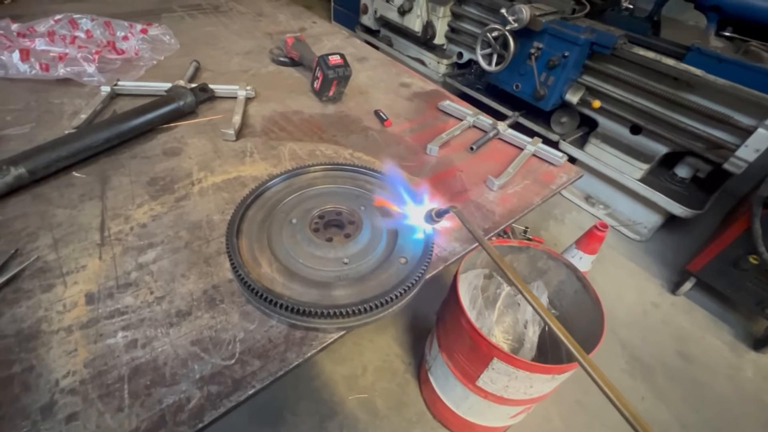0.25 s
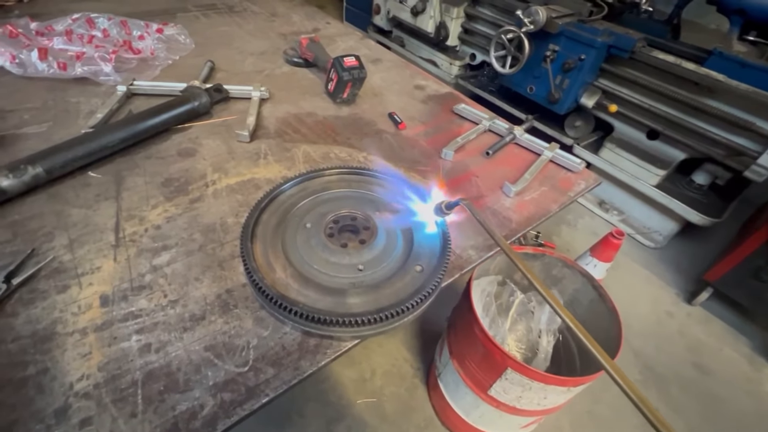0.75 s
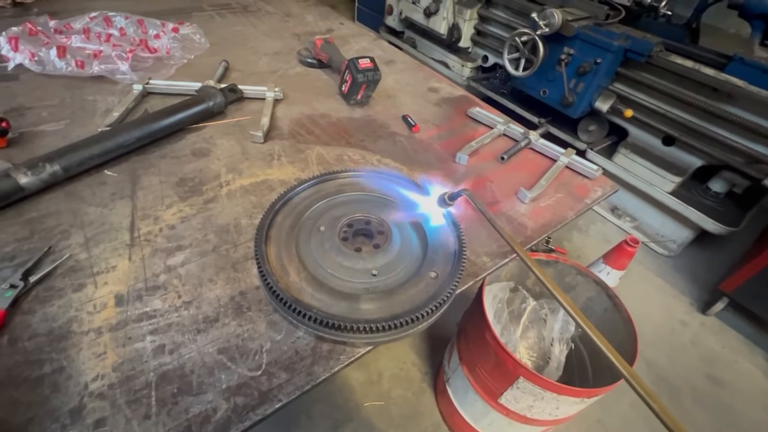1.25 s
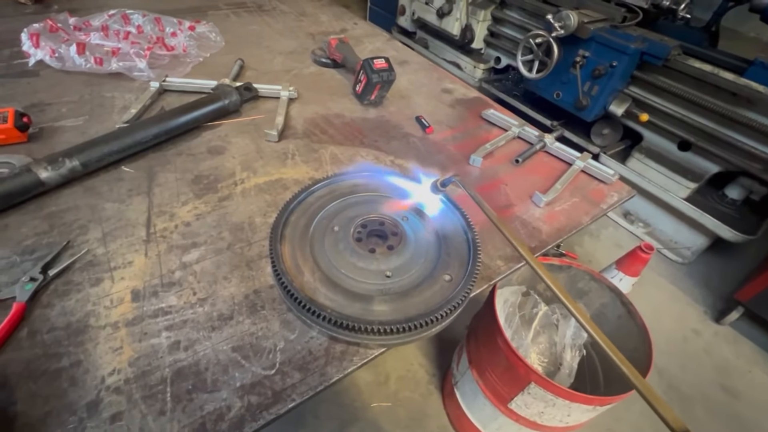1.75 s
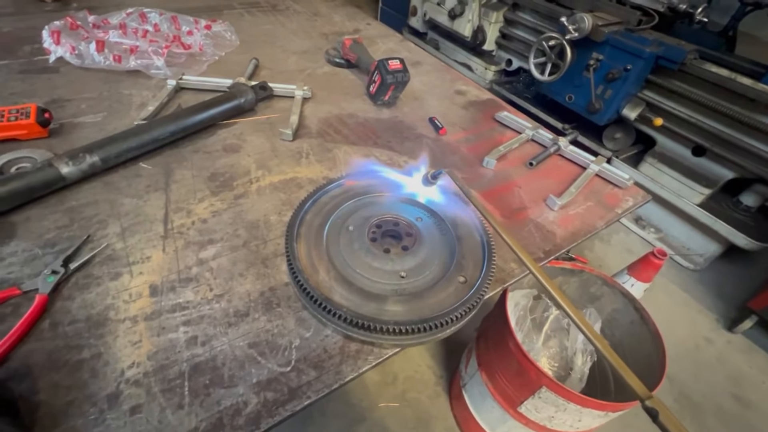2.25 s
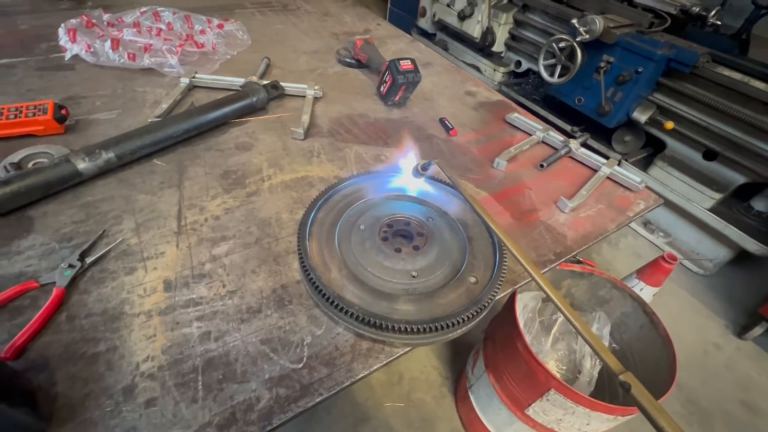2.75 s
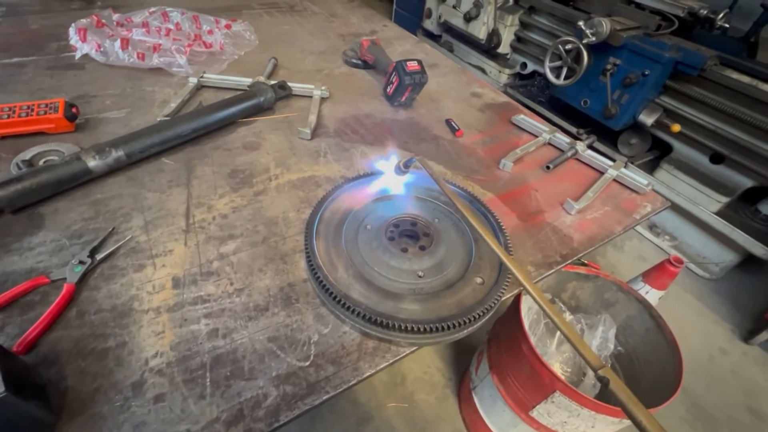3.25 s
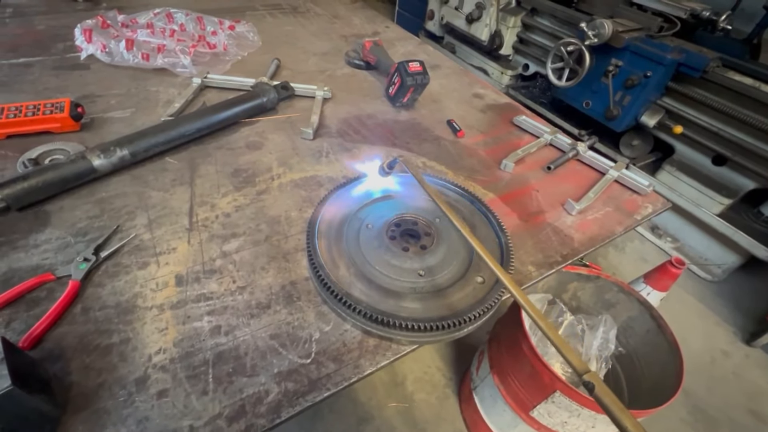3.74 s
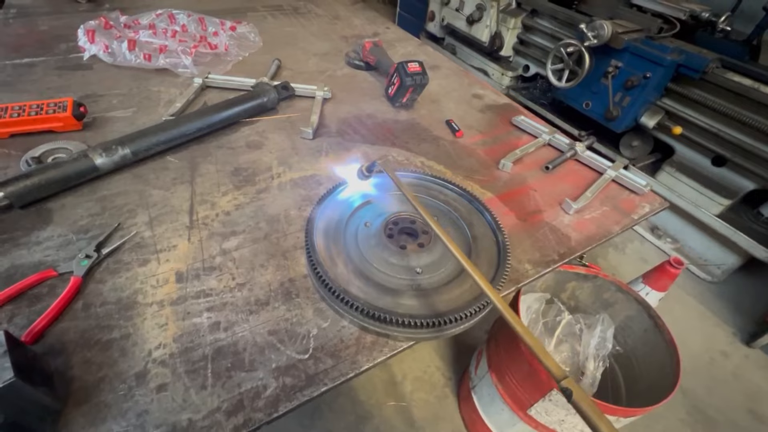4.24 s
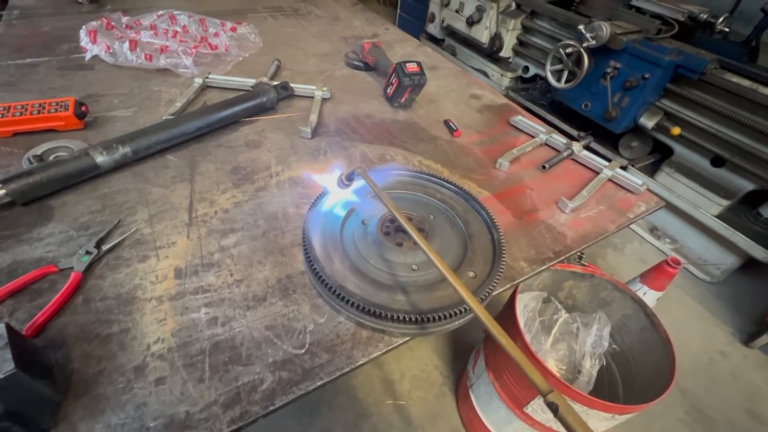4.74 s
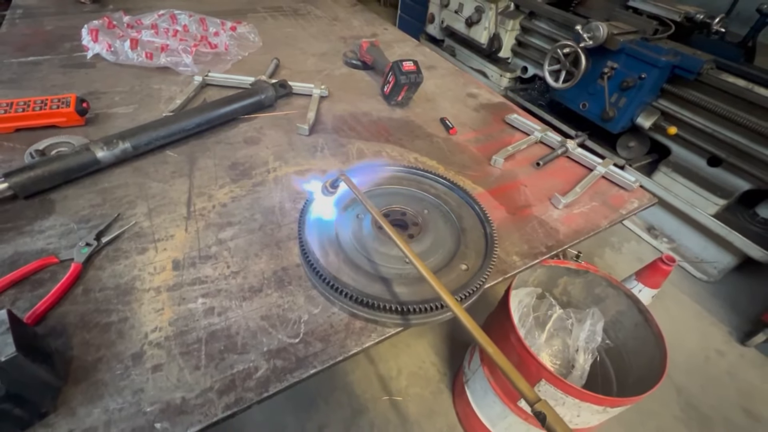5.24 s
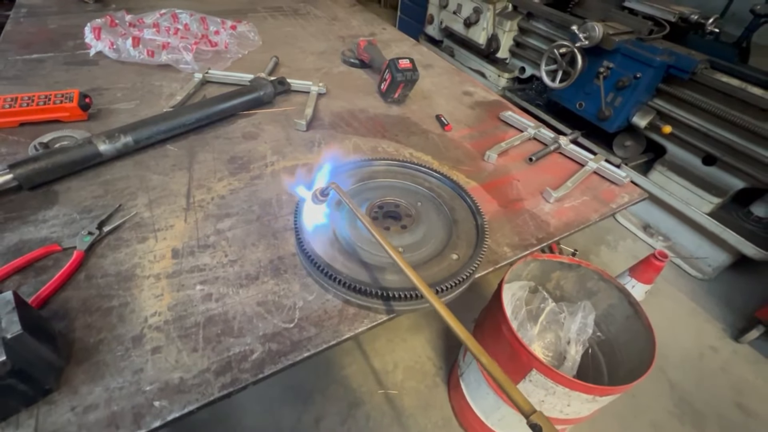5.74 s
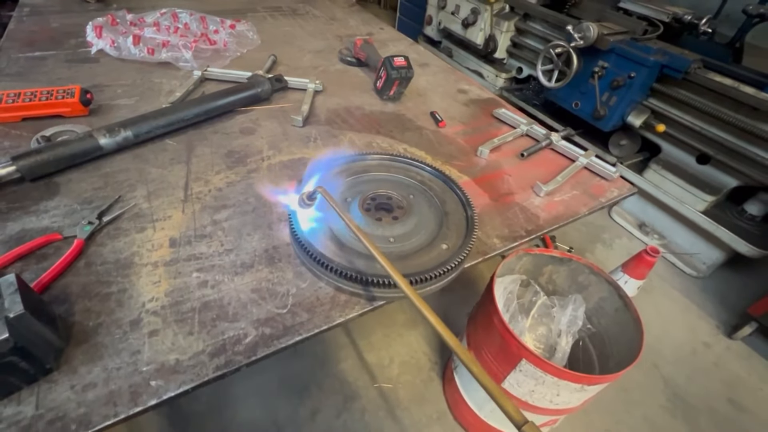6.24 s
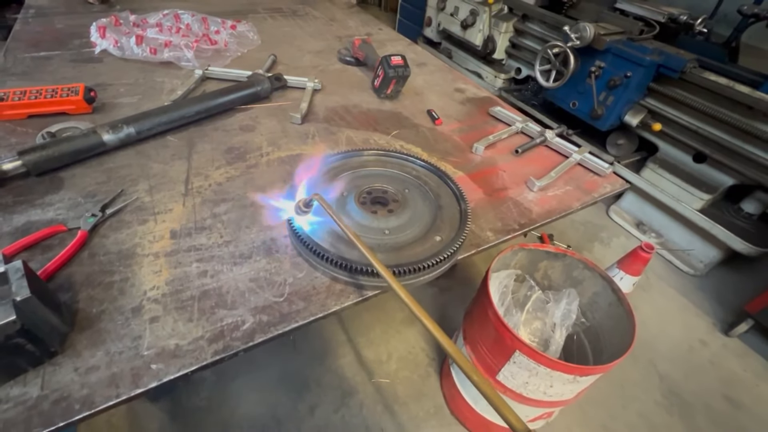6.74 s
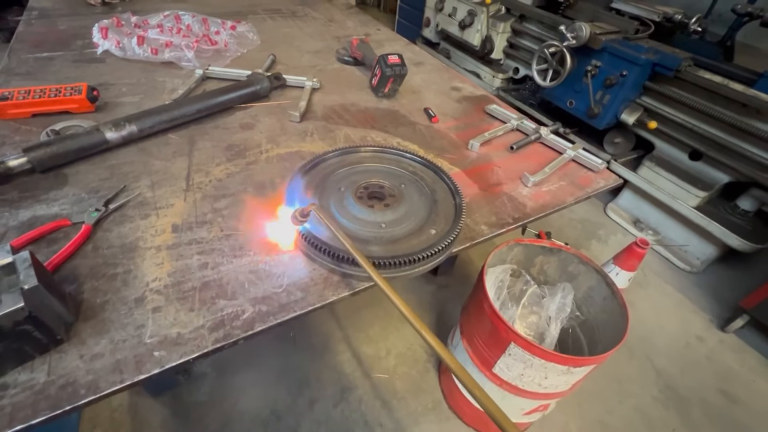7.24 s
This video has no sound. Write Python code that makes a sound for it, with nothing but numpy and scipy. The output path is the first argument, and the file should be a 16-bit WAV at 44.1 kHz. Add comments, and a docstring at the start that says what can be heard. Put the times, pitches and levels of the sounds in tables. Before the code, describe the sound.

Close, continuous torch hiss over a soft low roar, swelling and changing colour as the flame moves around a steel disc in a workshop.

```python
"""On a workshop bench, a gas torch heats a steel flywheel near a hand-held camera.
The jet fizzes brightly: random noise shaped by pitch, with its level and colour moving over time.
Where it strikes the steel it sings in broad hissing bands that swell as the hand moves it, and once in a narrow
whistling hiss as the flame flares. Under this, the flame's noise roars low and steady.
The camera's two microphone ports hear it with a phase and level difference that changes with pitch and bearing."""
import sys
import numpy as np
from scipy import signal
from scipy.fft import rfft, irfft, next_fast_len
from scipy.io import wavfile
from scipy.ndimage import uniform_filter1d, map_coordinates

SR = 44100
rng = np.random.default_rng(int(sys.argv[2]) if len(sys.argv) > 2 else 0)


def to_wav(s):
    """Save 16-bit WAV."""
    ch = np.atleast_2d(s).T  # columns
    pcm = np.round(np.clip(ch, -1, 1) * 32767)  # PCM
    wavfile.write(sys.argv[1], SR, pcm.astype(np.int16))


N = 330309  # length in samples
FRAME, HOP = 1024, 256  # short-time spectrum: frame length and step, in samples

# How loud the fizz is over time, before a fixed lift: start_s, level_db
FIZZ_LEVEL = [(0.0, -27.5), (0.42, -27.5), (0.48, -26), (1.38, -23), (1.48, -35), (1.5, -25.5),
              (2.06, -30.5), (2.27, -23.5), (2.73, -27.5), (2.77, -22), (3.09, -29), (3.63, -31.5),
              (3.69, -36.5), (3.9, -30), (4.55, -31.5), (4.65, -27), (4.84, -40.5), (4.9, -28.5),
              (5.07, -39.5), (5.42, -31.5), (5.8, -39.5), (5.94, -32.5), (5.99, -35), (6.18, -32.5),
              (6.25, -26.5), (6.34, -22.5), (6.55, -28), (6.78, -25.5), (7.09, -31.5), (7.22, -25.5),
              (7.28, -34), (7.49, -30)]
# Tone colour of the nozzle fizz: pitch_hz, relative_level_db (per Hz)
FIZZ_COLOUR = [(2500, -30), (4200, -18), (6200, -9), (7300, -11), (8500, -7), (9300, -7), (10500, -4),
               (11700, 0), (12400, -2.5), (12900, -10), (13200, -7), (13600, -11.5), (14300, -8),
               (15600, -4.5), (16500, -5)]
# How the fizz tilts over time: start_s, gain_near_9khz_db, gain_near_15khz_db
FIZZ_TILT = [(0, -4, 2), (0.85, -7, 0), (1.2, -6, -1), (1.8, -1.5, -2), (2.6, -3.5, 1), (3.2, -0.5, 3),
             (4.0, 5.5, 5), (4.6, 3, 1), (5.2, -1.5, 5), (5.5, 5, 0), (5.8, -9, 6), (6.15, 1, -2),
             (6.5, 0.5, 0), (7, -2.5, 4), (7.49, 5, 5)]
# Where each tilt gain acts: pitch_hz, weight_of_9khz_gain (0-1), weight_of_15khz_gain (0-1)
TILT_REACH = [(7500, 0, 0), (9000, 1, 0), (11500, 0, 0), (13500, 0, 0), (15000, 0, 1)]
FLICKER_DB, FLICKER_PER_S = 1, 25  # quick unsteadiness of the whole fizz
EDGE_DRIFT_DB, EDGE_DRIFT_PER_S = 2.4, 5  # each tilt gain also drifts alone


def jet():
    """Turbulence at the nozzle: bright fizz in eddies, its colour tilting as the torch turns."""
    hz, t = grid()
    level_db, = curves(FIZZ_LEVEL, t)
    low_reach, top_reach = curves(TILT_REACH, hz)
    low_tilt_db, top_tilt_db = (EDGE_DRIFT_DB * wobble(EDGE_DRIFT_PER_S) + db for db in curves(FIZZ_TILT, t))
    level_db = level_db + 5.5 + FLICKER_DB * wobble(FLICKER_PER_S)
    tilt_db = low_reach * low_tilt_db + top_reach * top_tilt_db
    fizz = spectrum(FIZZ_COLOUR) * amp(level_db + tilt_db) ** 2
    broad_eddies = patches(2.14, 2440, .04)
    narrow_eddies = patches(3.2, 400, .03)
    return panned(fizz * broad_eddies * narrow_eddies, 0)


# The jet on the steel; the low band is lifted a little when played:
# start_s, low_band_db, 5khz_band_db, 6khz_band_db, high_band_db
STRIKE_LEVELS = [(0.0, -49, -47, -38, -36), (0.08, -40, -47, -34, -24), (0.48, -42, -33, -33, -25.5),
                 (0.64, -43, -51, -41, -33), (0.7, -43, -36, -38, -25.5), (0.77, -35.5, -24.5, -36, -23),
                 (0.92, -35.5, -40, -47, -38), (1.04, -34, -28, -29, -36), (1.23, -38.5, -35.5, -37, -21.5),
                 (1.42, -37, -27.5, -43, -29), (1.77, -35.5, -33.5, -25.5, -23.5),
                 (2.09, -42, -37.5, -33, -38), (2.25, -39, -22.5, -33, -39),
                 (2.4, -31, -28.5, -22.5, -18.5), (2.54, -32, -26, -28.5, -44),
                 (2.67, -29.5, -25, -48, -61), (3.09, -34.5, -30.5, -25.5, -27),
                 (3.27, -37.5, -38, -33, -44), (3.54, -37.5, -31, -21, -38), (3.6, -38.5, -31, -34, -40),
                 (3.66, -45, -41, -43, -32), (3.78, -45.5, -35, -38, -35), (3.9, -40.5, -41, -31.5, -47),
                 (3.98, -42.5, -39, -35, -41), (4.3, -47.5, -37.5, -36, -37),
                 (4.65, -44.5, -36.5, -38, -48), (5.17, -51.5, -39.5, -46.5, -38),
                 (5.46, -41.5, -32.5, -38, -34.5), (5.55, -51.5, -37, -42, -36),
                 (6.01, -40.5, -44, -35, -38), (6.18, -39.5, -35, -33.5, -37),
                 (6.26, -36.5, -29, -23.5, -36), (6.4, -35, -26.5, -21, -40),
                 (6.84, -35.5, -33, -31.5, -30), (7.05, -43.5, -36.5, -41, -30),
                 (7.28, -50, -35.5, -49, -33), (7.49, -43, -40, -31, -31)]
# Centres of the two wandering bands, in Hz, as the torch goes from right to left
LOW_HZ, HIGH_HZ = (3600, 3510, 3620, 3770), (7130, 7700)
LOW_WANDER, HIGH_WANDER, WANDER_PER_S = 0.0096, 0.077, 7  # random wander, as a share of the centre
# Pan, left minus right: 5 kHz band with the torch at the right and at the left; high band throughout
FIVE_PAN_DB, HIGH_PAN_DB = (5, -2), -1.5
BAND_DRIFT_DB, BAND_DRIFT_PER_S = 1.5, 13  # each band swells and sinks alone


def strike():
    """The jet hitting rim and teeth sings in four broad bands, two of which wander in pitch."""
    low_db, five_db, six_db, high_db = curves(STRIKE_LEVELS, grid()[1])
    low_hz = bearing(*LOW_HZ) * (1 + LOW_WANDER * wobble(WANDER_PER_S))
    high_hz = bearing(*HIGH_HZ) * (1 + HIGH_WANDER * wobble(WANDER_PER_S))

    def drifting(db):
        """Power of one band as it swells and sinks."""
        return amp(db + BAND_DRIFT_DB * wobble(BAND_DRIFT_PER_S)) ** 2

    low = band(low_hz, 770) * drifting(low_db + 3)
    five = band(5160, 900) * drifting(five_db)
    six = band(6200, 670) * drifting(six_db)
    high = band(high_hz, 1230) * drifting(high_db)
    both = panned(low + six, 0) + panned(five, bearing(*FIVE_PAN_DB)) + panned(high, HIGH_PAN_DB)
    return both * patches(2.9, 250, .05) * patches(0.94, 2800, .025)


# A narrow whistling hiss as the flame flares: start_s, pitch_hz, level_db
FLARE_PATH = [(6.15, 7200, -60), (6.27, 7160, -34), (6.4, 7060, -28.5), (6.55, 7160, -28), (6.7, 6930, -29),
              (6.85, 7100, -31.5), (6.97, 7600, -35), (7.1, 7500, -63)]


def flare():
    """The flame catching the rim's edge sings in one narrow band, loudest at the right port."""
    t = grid()[1]
    hz, db = curves(FLARE_PATH, t)
    sounding = (t > FLARE_PATH[0][0]) & (t < FLARE_PATH[-1][0])
    return panned(band(hz, 270) * sounding * amp(db) ** 2 * patches(2.2, 400, .04), -14.0)


# Tone colour of the low roar: pitch_hz, relative_level_db (per Hz)
LOW_COLOUR = [(20, -50), (35, -46), (50, -32), (70, -8), (100, 0.5), (250, 1.5), (420, 1), (600, -4.5),
              (850, -9), (1500, -31.5), (3000, -31)]
# Tone colour of the upper roar: pitch_hz, relative_level_db (per Hz)
UPPER_COLOUR = [(500, 0), (850, 2), (1150, 5.5), (1350, -2), (1500, -0.5), (1650, -1.5), (2000, -41)]
# Tone colour of the thin roar: pitch_hz, relative_level_db (per Hz)
THIN_COLOUR = [(1100, -22), (1450, 1), (1650, 10), (1900, 11.5), (2200, 9.5), (2700, 6.5), (3100, 6),
               (4000, -20), (8000, -30)]
# How loud the two weaker roars are, before fixed lifts: start_s, upper_roar_db, thin_roar_db
ROAR_LEVELS = [(0.0, -38.5, -44), (0.7, -38.5, -42), (1.44, -41, -43.5), (2.0, -40, -40),
               (2.42, -40.5, -42), (2.9, -40, -54), (3.38, -43, -51), (3.98, -40.5, -48.5), (4.6, -43, -49),
               (5.28, -45.5, -48), (6.0, -42.5, -48.5), (6.5, -39.5, -57), (7.0, -39, -48.5),
               (7.49, -36, -46.5)]
ROAR_DB, ROAR_GROWS_DB = -34, 1  # the low roar holds steady, a little fuller with the torch at the left


def flame():
    """Burning gas: a steady low roar and two weaker humps above it."""
    upper_db, thin_db = curves(ROAR_LEVELS, grid()[1])
    low = spectrum(LOW_COLOUR) * amp(bearing(ROAR_DB, ROAR_DB + ROAR_GROWS_DB)) ** 2
    upper = spectrum(UPPER_COLOUR) * amp(upper_db + 1.5) ** 2
    thin = spectrum(THIN_COLOUR) * amp(thin_db + 2.5) ** 2
    return panned((low + upper + thin) * patches(0.85, 300, 0.027), 0)


def bench():
    """Echoes off steel and bench colour the hiss in narrow, slowly shifting streaks, a little apart at each port."""
    return patches(1.7, 120, .25) * panned(1, 1.2 * echoed() * field(200, .3))


def echoed():
    """The middle band, where echoes of the workshop reach the two ports differently."""
    hz = grid()[0]
    return (hz > 1500) & (hz < 8300)


# How far the left side leads, in half turns of phase, by where the torch is:
# pitch_hz, at_right, at_far_right, at_far_left, at_left (half turns)
PORT_LEAD = [(40, -.03, -.03, -.03, -.03), (215, -.09, -.09, -.09, -.09), (400, -.27, -.26, -.25, -.25),
             (700, -.5, -.45, -.4, -.42), (800, -.72, -.75, -.72, -.7), (900, -1.05, -1.05, -1.1, -1),
             (1400, -2.4, -2.5, -2.6, -2.2), (1600, -2.55, -2.7, -2.9, -2.3), (1800, -2.95, -3, -3.3, -2),
             (2000, -2.95, -3.1, -2.5, -2.4), (2200, -3, -3.2, -2.9, -3), (2400, -3.1, -2.4, -3.2, -3),
             (2600, -3.1, -2.8, -2.3, -3), (2800, -2.8, -2.85, -2.1, -2.1), (3100, -2.95, -2.75, -2.35, -2),
             (3400, -3.05, -2.9, -2.5, -2.1), (3600, -3.6, -3.5, -2.9, -2.4),
             (4000, -3.85, -3.8, -3.1, -2.55), (4400, -3.95, -4.1, -2.9, -2.8),
             (4800, -4, -2.85, -2.9, -2.85), (5000, -4, -3.3, -3.2, -2.95), (5400, -3.7, -3.5, -3.5, -3.5),
             (6000, -4, -4, -4, -4), (6400, -4.2, -4.2, -4.2, -4.2), (7200, -5.75, -5.75, -5.75, -5.75),
             (8400, -6.1, -6.1, -6.1, -6.1), (8900, -6, -6, -6, -6), (12200, -4, -4, -4, -4),
             (13900, -3, -3, -3, -3), (15500, -2, -2, -2, -2), (17000, -2, -2, -2, -2)]
# Best likeness of left and right, by where the torch is: pitch_hz, at_right (0-1), at_left (0-1)
PORT_LIKENESS = [(40, .88, .88), (100, .985, .985), (215, .97, .97), (400, .95, .95), (820, .94, .87),
                 (880, .94, .8), (1050, .65, .65), (1400, .8, .7), (1600, .85, .55), (1900, .85, .45),
                 (2200, .88, .75), (2400, .7, .85), (2600, .55, .7), (2800, .7, .35), (3100, .8, .75),
                 (3300, .88, .75), (3450, .55, .75), (3800, .9, .65), (4200, .8, .8), (4700, .6, .85),
                 (5000, .7, .7), (5300, .6, .6), (6100, .98, .98), (6800, .75, .75), (8400, .85, .85),
                 (8900, 1, 1), (17000, 1, 1)]
# Left minus right level, by where the torch is: pitch_hz, at_right_db, at_left_db
PORT_SHADOW = [(215, 0, 0), (390, 1.5, 1.5), (600, -3.5, -1.5), (750, 0, -1), (860, -1, -4), (920, -6, -8),
               (1000, -11, -10), (1100, -12.5, -8), (1300, -2.5, -6), (1500, -3, -3.5), (1650, 3, -1),
               (1900, 2, 1), (2050, 0, 2.5), (2250, 0, 0), (2500, -4, 0), (2900, -3, -1), (3250, 0, 0),
               (3600, 3.5, 1.5), (4000, -1, .5), (4500, -3, 0), (5000, 0, 0)]
# Narrow drifting stretches of the hiss where left and right are exact opposites:
# start_s, end_s, from_hz, to_hz, half_width_hz
OPPOSED_STRETCHES = [(0, .75, 3150, 3170, 300), (0, .45, 2280, 2220, 150), (.6, 1.6, 2250, 2180, 210),
                     (1.6, 2.05, 2150, 2070, 200), (1.0, 1.75, 3490, 3100, 171),
                     (1.2, 2.05, 1800, 1910, 90), (2.08, 2.45, 3000, 2850, 180),
                     (2.3, 3.6, 1920, 1770, 110), (2.5, 3.0, 3460, 3700, 110), (2.3, 3.15, 4930, 4950, 120),
                     (2.5, 3.15, 6760, 6370, 110), (3.0, 3.7, 2250, 2160, 100),
                     (3.35, 3.55, 4630, 4550, 300), (3.66, 3.76, 4700, 4500, 200),
                     (3.68, 3.76, 3300, 2900, 250), (3.82, 4.02, 4050, 4200, 350),
                     (4.0, 4.14, 4700, 4700, 150), (4.08, 4.33, 3900, 4000, 250),
                     (4.52, 4.78, 3930, 4050, 330), (4.76, 4.97, 3920, 4200, 330),
                     (4.91, 4.97, 2900, 2900, 450), (4.55, 4.7, 2600, 2300, 150),
                     (5.1, 5.7, 2390, 2400, 120), (5.9, 6.65, 2430, 2280, 200), (6.7, 7.3, 2500, 2530, 200),
                     (6.1, 6.42, 4170, 4050, 150), (6.68, 7.08, 4500, 4600, 200),
                     (7.15, 7.28, 4500, 4200, 400), (7.33, 7.49, 4560, 4600, 300),
                     (6.1, 6.3, 6800, 6850, 90)]
# Stretches where left and right are the same: start_s, end_s, from_hz, to_hz, half_width_hz
IN_STEP_STRETCHES = [(0, .3, 6050, 6100, 280), (.68, 1.8, 5940, 6200, 260), (.1, .7, 4200, 3850, 220),
                     (1.95, 2.13, 3970, 3600, 300), (2.4, 3.1, 4300, 4200, 110),
                     (3.75, 4.2, 3230, 2700, 220), (5.85, 6.8, 2850, 3430, 170),
                     (6.35, 7.2, 6350, 6350, 170), (6.45, 6.8, 4050, 3970, 130)]
# How much less alike left and right sound where their phase is a quarter turn apart: middle band, top band
APART_MIDDLE, APART_TOP = .3, .45
LIKENESS_SWING_DB = 7  # swing of the power the likeness is raised to, so it comes and goes in patches


def ports(power):
    """Noise of the given power, left and right: partly alike, turned in phase, one shadowed."""
    hz, t = grid()
    alike = bearing(*curves(PORT_LIKENESS, hz))
    shadow_db = bearing(*curves(PORT_SHADOW, hz))
    direct = np.clip(curves(BEARING_PATH, t)[1], 0, 1)
    middle, top = echoed(), hz > 8300
    # the moving torch makes the phase wander, most where echoes mix in
    wander = ((.35 + 2 * (1 - direct)) * middle + .2 * top) * field(250, .4)
    lead = np.pi * bearing(*curves(PORT_LEAD, hz)) + wander  # in radians
    # the phase lead of the hiss is drawn toward whole half turns, more strongly at the top
    lead = lead - (middle / 3 + top / 2) * np.sin(2 * lead)
    lead = lead - top * np.sin(2 * lead) / 2.5
    # left and right sound less alike where their phase is a quarter turn apart
    alike = alike - (APART_MIDDLE * middle + APART_TOP * top) * np.sin(lead) ** 2
    # the room's share of the hiss differs from port to port
    alike = alike * np.where(middle, direct, 1)
    alike = np.clip(alike, 0, 1) ** amp(LIKENESS_SWING_DB * middle * field(200, .09))
    # in narrow stretches left and right are alike and equally loud, opposed or in step
    opposed, in_step = locked(OPPOSED_STRETCHES), locked(IN_STEP_STRETCHES)
    to_opposed, to_in_step = np.angle(-np.exp(-1j * lead)), np.angle(np.exp(-1j * lead))
    lead = lead + opposed * to_opposed + in_step * to_in_step
    free = 1 - np.maximum(opposed, in_step)
    alike = 1 - (1 - alike) * free
    shadow_db = shadow_db * free
    power = power * free + power.mean(axis=0) * (1 - free)
    # eddies burst for a millisecond or two
    knots = rng.standard_normal(N // 40 + 40)
    burst = amp(0.26 * map_coordinates(knots, [np.arange(N + 2 * HOP) / 60]))
    noise = unit(burst * rng.standard_normal((2, N + 2 * HOP)))
    a, b = signal.stft(noise, nperseg=FRAME, noverlap=FRAME - HOP)[2][..., :len(t)]
    # mixing two separate noises by this angle gives the wanted likeness
    turn = np.arccos(np.clip(alike, 0, 1)) / 2
    left = (np.cos(turn) * a + np.sin(turn) * b) * np.exp(.5j * lead) * amp(shadow_db / 2)
    right = (np.cos(turn) * a - np.sin(turn) * b) * np.exp(-.5j * lead) * amp(-shadow_db / 2)
    pair = np.array([left, right]) * np.sqrt(power * len(hz))
    return signal.istft(pair, nperseg=FRAME, noverlap=FRAME - HOP)[1][:, :N]


LOCK_FADE_S, LOCK_WAVER_HZ = .025, 30  # how the locked stretches set in and waver in pitch
LOCK_RAGGED = .45  # how much they fray at the edges, as a share


def locked(rows):
    """How firmly, 0-1, left and right are tied at each frequency and moment."""
    hz, t = grid()
    near = np.zeros((len(hz), len(t)))
    fray = LOCK_RAGGED * field(170, .035)
    for start, end, from_hz, to_hz, half_hz in rows:
        centre = np.interp(t, [start, end], [from_hz, to_hz]) + LOCK_WAVER_HZ * wobble(19)
        inside = np.clip(np.minimum(t - start, end - t) / LOCK_FADE_S, 0, 1)
        closeness = np.clip(1 - abs(hz - centre) / (2 * half_hz), 0, 1)
        near = np.maximum(near, inside * closeness)
    return np.clip(4 * near * (1 + fray) - 1.6, 0, 1)


# Where the torch is over time: start_s, travel (right 0 to left 1), direct_share_of_hiss (0-1)
BEARING_PATH = [(0, 0, 1), (1.95, 0, 1), (2.1, .33, .95), (2.95, .33, .95), (3.1, .67, .9), (3.65, .67, .9),
                (3.8, .67, .7), (5, .75, .7), (6, .9, .7), (6.25, 1, 1), (7, 1, .95), (7.49, 1, .7)]


def bearing(*stops):
    """A value that passes through evenly spaced stops as the torch goes from right to left."""
    place = curves(BEARING_PATH, grid()[1])[0] * (len(stops) - 1)
    return sum(value * np.clip(1 - abs(place - k), 0, 1) for k, value in enumerate(stops))


def amp(db):
    """Decibels to an amplitude factor."""
    return 10 ** (np.asarray(db) / 20)


def unit(x):
    """Scaled to an rms of 1."""
    return x / np.sqrt(np.mean(x ** 2) + 1e-20)


def grid():
    """Frequencies (column) and times (row) of the short-time spectrum."""
    return np.fft.rfftfreq(FRAME, 1 / SR)[:, None], np.arange(N // HOP + 3) * HOP / SR


def curves(rows, at):
    """Each column after the first, read at the given points."""
    first, *cols = np.transpose(rows)
    return [np.interp(at, first, c) for c in cols]


def share(power):
    """A spectrum whose powers add up to 1."""
    return power / power.sum(axis=0)


def spectrum(points):
    """Power share of (Hz, dB) points joined on a log axis."""
    hz, db = np.transpose(points)
    level_db = np.interp(np.log(grid()[0] + 1), np.log(hz), db, left=-120, right=-120)
    return share(amp(level_db) ** 2)


def band(centre_hz, width_hz):
    """Power share of a steep resonance."""
    return share(1 / (1 + ((grid()[0] - centre_hz) / width_hz) ** 2) ** 2)


def field(wide_hz, long_s):
    """A random field of rms 1, smooth over a patch of frequency and time."""
    hz, t = grid()
    chance = rng.standard_normal((len(hz), len(t)))
    chance = uniform_filter1d(chance, max(1, round(wide_hz * FRAME / SR)), 0)
    return unit(uniform_filter1d(chance, max(1, round(long_s * SR / HOP)), 1))


def patches(depth_db, wide_hz, long_s):
    """Random power gain in patches, mean 1."""
    power = amp(depth_db * field(wide_hz, long_s)) ** 2
    return power / power.mean()


def wobble(rate):
    """A smooth random curve over time, rate knots a second (40 at most)."""
    t = grid()[1]
    return map_coordinates(rng.standard_normal(int(t[-1] * 40) + 4), [t * min(rate, 40)])


def panned(power, pan_db):
    """Left and right power, pan_db apart."""
    return np.array([power * amp(pan_db), power * amp(-pan_db)])


def scene():
    """All layers add in power and reach the ports together; the bench colours all but the flame."""
    hiss = jet() + strike() + flare()
    return ports(flame() + hiss * bench())


TOP_HZ = 15770  # the camera's band limit


def record(dry):
    """The camera cuts the deep bass and keeps nothing above its band limit."""
    m = next_fast_len(N + 8192)
    hz = np.fft.rfftfreq(m, 1 / SR)
    bass_cut = 1 / np.sqrt(1 + (45 / (hz + 1)) ** 4)
    return irfft(rfft(dry, m) * bass_cut * (hz < TOP_HZ), m)[:, :N]


dry = scene()
out = record(dry)
to_wav(out)
```